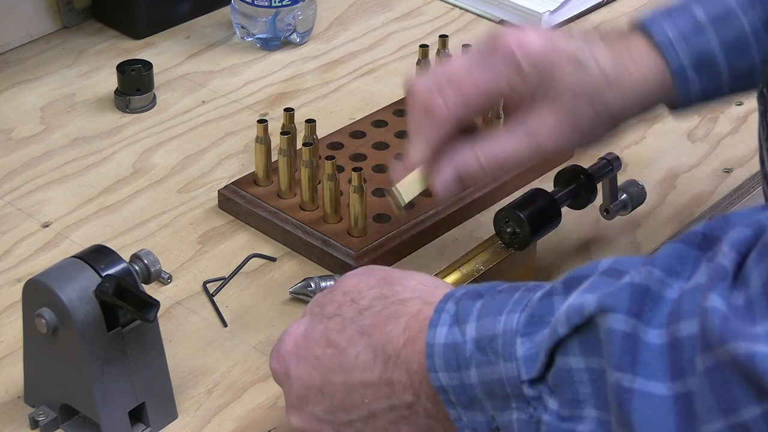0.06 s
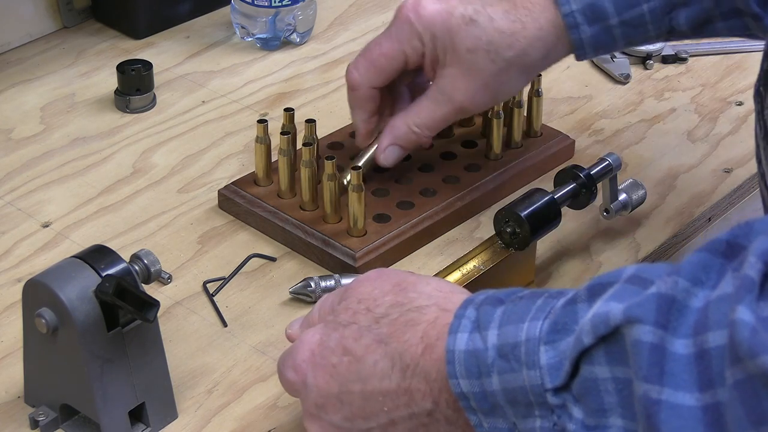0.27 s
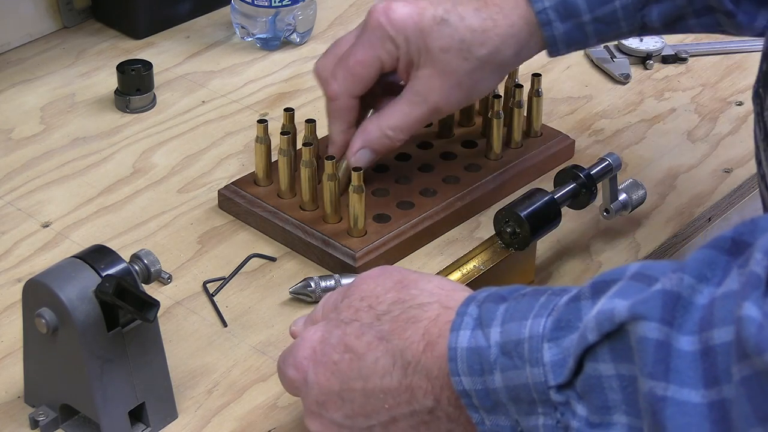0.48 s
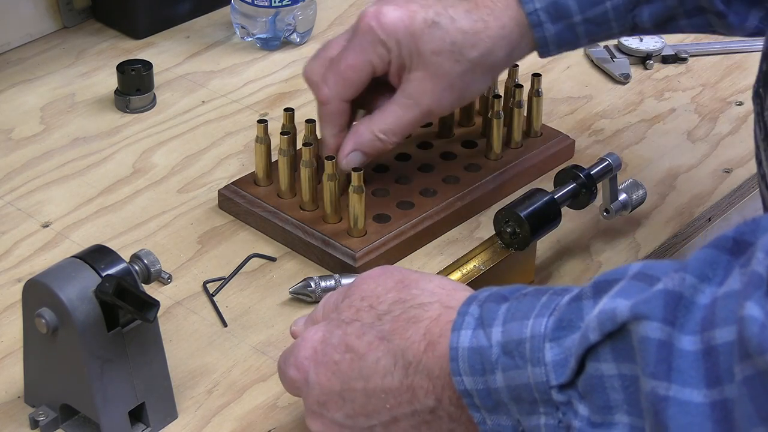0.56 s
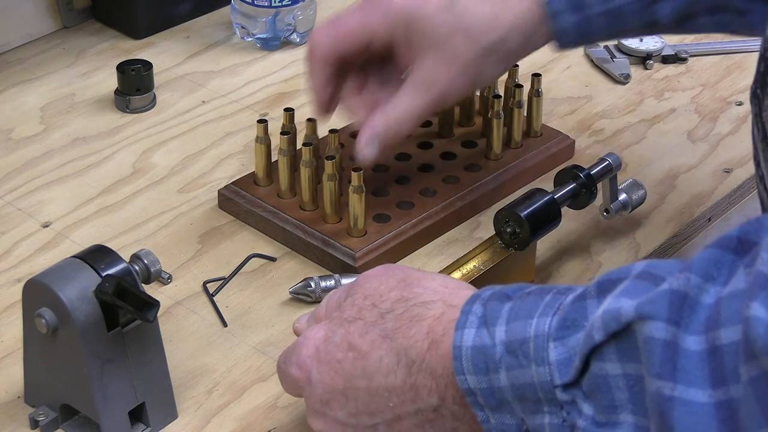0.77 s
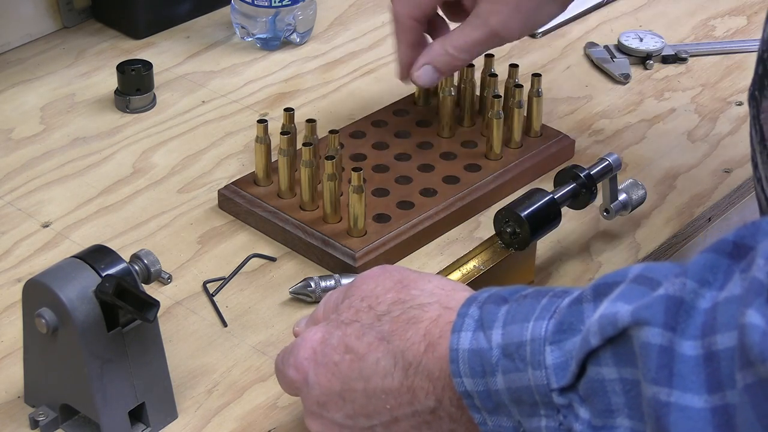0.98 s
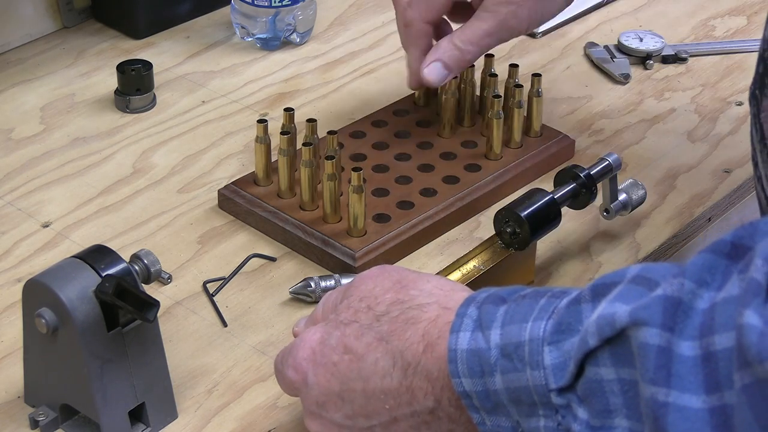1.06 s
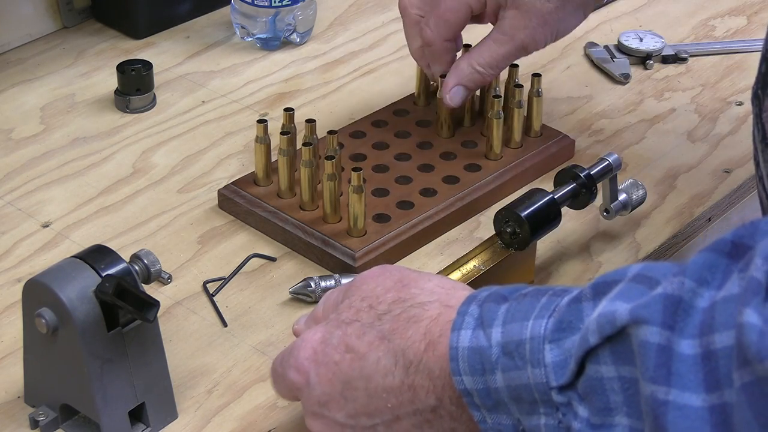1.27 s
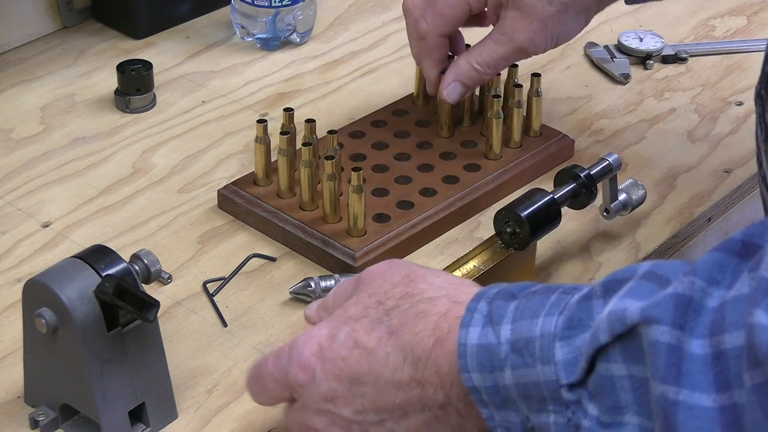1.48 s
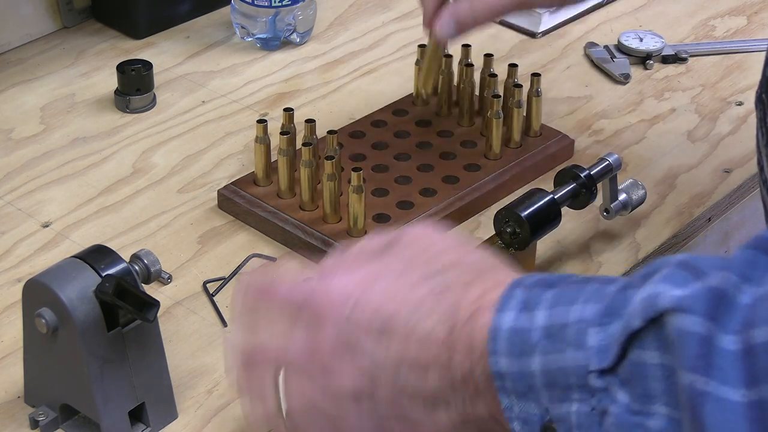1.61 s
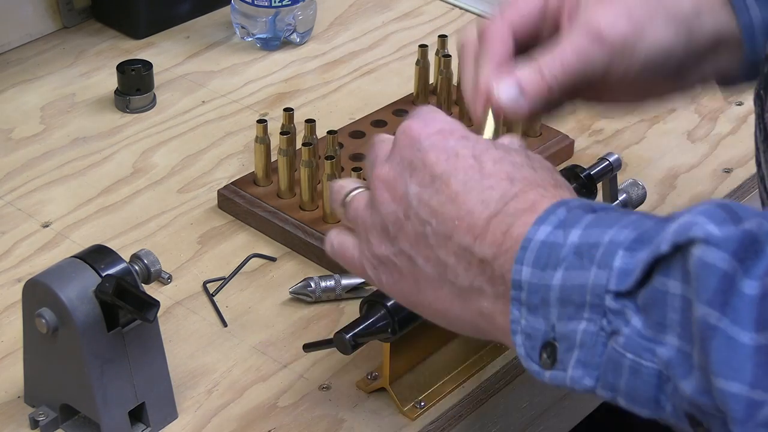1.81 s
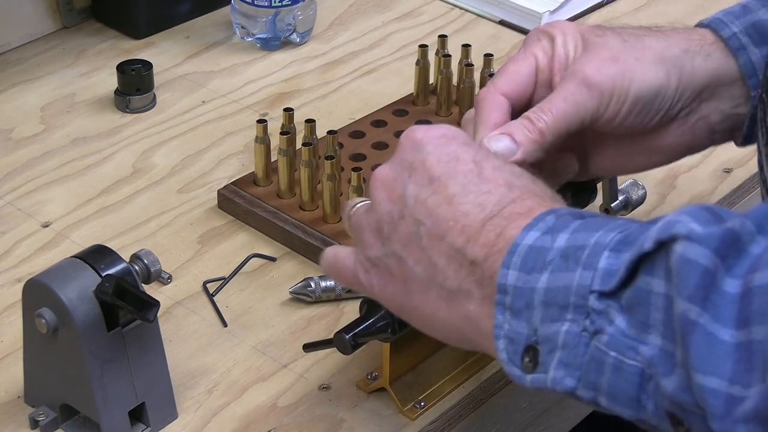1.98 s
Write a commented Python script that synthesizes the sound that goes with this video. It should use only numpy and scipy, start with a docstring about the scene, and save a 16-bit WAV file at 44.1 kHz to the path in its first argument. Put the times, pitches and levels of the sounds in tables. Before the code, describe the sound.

A brass cartridge case drops into a wooden block with a knock and a thin ring. Fingers rattle other cases and draw one out with a faint scrape, over soft bench thumps in a small room.

```python
"""A wooden workbench in a small, live room; one microphone hears the bench and the walls' reply.
A brass cartridge case drops into a wooden loading block: the wood knocks, the thin brass rings and
settles. Fingers rattle the next cases in their holes and draw one out with a faint scrape.
Underneath are steady room tone, a rustling sleeve and dull low bench thumps, from the brass knocks
and the shifting forearm."""
import sys
import numpy as np
from scipy import signal
from scipy.fft import rfft, irfft
from scipy.io import wavfile
from scipy.ndimage import uniform_filter1d

SR = 44100
rng = np.random.default_rng(int(sys.argv[2]) if len(sys.argv) > 2 else 0)


def output_pcm(signal):
    """Save a mono or channel-first signal as 16-bit PCM at the path in sys.argv[1].

    Samples are clipped to [-1, 1] before scaling.
    """
    pcm = np.clip(np.atleast_2d(signal).T, -1, 1) * 32767
    wavfile.write(sys.argv[1], SR, np.round(pcm).astype(np.int16))


N = 90404

# the room's decay time: frequency_hz, t60_s
ROOM_DECAY = [(150, 0.4), (500, .5), (1400, 0.56), (3700, 0.36), (9000, 0.52), (15000, 0.03)]
# colour of its reverberation: frequency_hz, gain_db
ROOM_COLOUR = [(150, 2), (1400, 0), (3700, -6), (9000, -11), (15000, -4.5)]
# steady room tone: frequency_hz, relative_db
ROOM_TONE = [(20, -0.5), (280, 1), (500, -0.5), (1000, -13), (2000, -23.5), (4000, -23), (8000, -29.5),
             (16000, -35)]
# the room still ringing from a knock just before: frequency_hz, gain_db
LINGERING_COLOUR = [(60, -13), (250, 8), (700, 13.5), (1500, -2.5), (4200, 5.5), (9800, -0.5), (12000, -25),
                    (16000, -28)]
# the sleeve's rustle: time_s, level_db
SLEEVE_LEVEL = [(0, -56.5), (.5, -59), (.68, -68.5), (1.001, -64), (1.2, -54), (1.42, -58.5), (1.62, -52),
                (1.78, -62.5), (1.94, -55.5), (2.05, -59.5)]
# colour of the cloth: frequency_hz, relative_db
SLEEVE_COLOUR = [(40, -3), (250, 6.5), (550, 0.5), (1200, -6.5), (2500, -23.5), (5000, -24.5),
                 (16000, -33.5)]
# dull low bench thumps, from the brass knocks and the shifting forearm: start_s, pitch_hz, level_db
BENCH_THUMPS = [(0.225, 135.5, -46), (.83, 124, -44), (1.072, 178.5, -43), (1.151, 130, -33),
                (1.175, 64.3, -38), (1.2, 118.4, -34), (1.232, 85, -36.5), (1.275, 89, -37.5),
                (1.315, 74, -28), (1.354, 98.3, -30), (1.36, 148.6, -41), (1.505, 114, -38.5),
                (1.555, 100.5, -36), (1.608, 103, -40.5), (1.716, 94, -35), (1.738, 68.3, -31),
                (1.766, 136, -38.5), (1.86, 70, -44)]
# a case sliding: start_s, length_s, pitch_hz, width_hz, level_db
CASE_SCRAPES = [(1.438, .07, 9760, 249, -69.5), (1.556, 0.051, 10060, 300, -67),
                (1.905, 0.079, 4200, 1800, -66), (1.913, 0.049, 1000, 70, -58)]
# the hollow block (low), a case chattering in its hole (high): start_s, pitch_hz, level_db, t60_s
CHATTER_NOTES = [(0.2234, 475, -6, .026), (.2228, 3140, -29.5, 0.03), (.3945, 594, -26.5, 0.036),
                 (0.3948, 1216, -33, 0.047), (0.3941, 1836, -36.5, 0.066), (0.7043, 4180, -35.5, 0.021),
                 (.7597, 1983, -31, 0.041), (.7597, 3560, -26, 0.04), (.7597, 4520, -24, .028),
                 (0.8225, 490, -8, .023), (1.0712, 3000, -9, .004), (1.0716, 1760, -44, 0.031),
                 (1.0739, 4640, -31.5, .045), (1.074, 4400, -50.5, 0.74), (1.229, 4420, -21, .024),
                 (1.229, 4430, -54.5, 0.47), (1.474, 2102, -35.5, 0.057), (1.4741, 3190, -21, 0.007),
                 (1.633, 2207, -41, 0.099), (1.633, 1322, -42, 0.097), (1.632, 1028, -40.5, 0.096)]
# wall modes of a case, in three close groups: pitch_hz, relative_db, t60_s
WALL_MODES = [
    [(9066, -1.5, .6), (9080, -1, .16), (9370, -2, .07)],
    [(9783, -6, .25), (9811, -9, .2), (9825, 2, .055), (9848, -18, .25)],
    [(12484, 0, .33), (12515, -7, .3)],
]
# a case ringing: start_s, low_group_db, mid_group_db, high_group_db, damping_db_per_s, room_gain
CASE_CLINKS = [(.223, -35, -19, -45.5, 6.4, 0.39), (.7597, -51.5, -54, -53.5, 70, 0.73),
               (1.073, -47, -58, -64, 330, 0.81), (1.229, -67, -57, -67, 70, 0.77)]
# colour shared by all knocks: frequency_hz, gain_db
WOOD_COLOUR = [(40, -24), (340, -8), (450, 0), (800, -2.5), (2700, -4), (4500, -.5), (5100, -8.5),
               (7000, -4.5), (9800, -4), (11300, -13), (16000, -22)]
# resonances of block, bench and seated cases: pitch_hz, width_hz, lift_db
BLOCK_RESONANCES = [(524, 26, 6), (588, 20, 4.5), (766.5, 22, 7), (1214, 60, 5.5), (1336, 45, 5),
                    (1850, 70, 5), (2014, 160, 4.5), (3290, 130, 6), (3920, 70, 4), (4430, 140, 4),
                    (5520, 160, 9), (6090, 230, 6), (8440, 100, 5)]
# the five bands of a knock: thud_hz, knock_hz, clack_hz, snap_hz, tick_hz
KNOCK_BANDS = (500, 1100, 2100, 4200, 8000)
# brass striking wood: start_s, thud_db, knock_db, clack_db, snap_db, tick_db
WOOD_KNOCKS = [ (0.2226, 13, 10.5, 11.5, 5.5, 2.5), (0.3934, -0.5, 2, -0.5, -17.5, -22.5),
               (0.5327, -15, -11, -12, -24, -28.5), (0.5605, -8, -15, -14, -26.5, -39),
               (0.5742, -3, -9, -15, -31, -36), (0.7042, -4.5, -12.5, -11.5, -19, -37),
               (0.756, -28, -5, -2.5, -3, -20), (.7595, -2.5, 4, 7, 4, -13), (.773, -9, -6, -2, -5.5, -21),
               (0.8218, 6.5, 5.5, 5.5, -17, -25.5), (1.0553, 1, 1, -1, -2.5, -22),
               (1.0711, -2.5, -1, 4, 2.5, -16.5), (1.075, -5.5, -4, -10, 1.5, -11.5),
               (1.2274, 4.5, -0.5, 0, 0, -20.5), (1.4741, -10, -13, -3.5, -10, -36),
               (1.483, -8, -4.5, -6, -11, -44), (1.632, -7.5, -6.5, -11, -16, -24),
               (1.638, -10.5, -9, -11.5, -24, -37)]


def amp(db):
    """Decibels to gain."""
    return 10 ** (np.asarray(db) / 20)


def unit(x):
    """Scales to rms 1."""
    return x / np.sqrt(np.mean(x ** 2) + 1e-20)


def curve_at(points, hz):
    """Reads a curve on a log-frequency axis."""
    frequencies, values = np.transpose(points)
    return np.interp(np.log(hz + 1), np.log(frequencies), values)


def add(mix, start_s, sound):
    """Mixes a sound in at start_s."""
    part = mix[round(start_s * SR):][:len(sound)]
    part += sound[:len(part)]


def colour(x, points):
    """Filters x by a gain curve."""
    hz = np.fft.rfftfreq(len(x), 1 / SR)
    return irfft(rfft(x) * amp(curve_at(points, hz)), len(x))


def ringing_response(db):
    """The minimum-phase impulse response of a gain curve."""
    cepstrum = irfft(np.log(amp(db)))
    half = len(cepstrum) // 2
    folded = np.r_[cepstrum[0], 2 * cepstrum[1:half]]
    return irfft(np.exp(rfft(folded, len(cepstrum))))[:half]


def whiten(burst, bins):
    """Evens out the broad colour of a burst and keeps its fine ripple."""
    spectrum = rfft(burst, 2 * len(burst))
    broad_power = uniform_filter1d(abs(spectrum) ** 2, bins)
    return irfft(spectrum / np.sqrt(broad_power + 1e-12))[:len(burst)]


def mode(t, hz, db, t60):
    """One dying vibration."""
    return amp(db - 60 * t / t60) * np.sin(2 * np.pi * hz * t)


def flutter(count, hz):
    """Slow complex noise of rms about 1."""
    lowpass = signal.butter(2, hz, fs=SR, output="sos")
    slow = signal.sosfilt(lowpass, rng.standard_normal((2, count + SR // 2)))
    real, imag = unit(slow)[:, -count:]
    return (real + 1j * imag) / np.sqrt(2)


def room_tail(rise_s=0.0087):
    """The walls' diffuse reply at the microphone, each band dying at its own speed."""
    hz, t, bands = signal.stft(rng.standard_normal(SR * 2 // 3), SR, nperseg=256)
    t60 = curve_at(ROOM_DECAY, hz)[:, None]
    equal_energy = np.sqrt(np.log(1e6) / t60 / SR)
    bands *= amp(curve_at(ROOM_COLOUR, hz)[:, None] - 60 * t / t60) * equal_energy
    tail = signal.istft(bands, SR, nperseg=256)[1]
    age = np.arange(len(tail)) / SR
    return tail * (1 - np.exp(-(age / rise_s) ** 2))


def in_room(direct, wet):
    """The direct sound with its reverberation."""
    return direct + wet * signal.fftconvolve(direct, room_tail())[:N]


def room_tone(level_db=-55.5):
    """Steady low noise all round the microphone."""
    return amp(level_db) * unit(colour(rng.standard_normal(N), ROOM_TONE))


def lingering_ring(age_s=0.03):
    """The room still rings from a knock just before."""
    out = np.zeros(N)
    add(out, 0, colour(room_tail(), LINGERING_COLOUR)[round(age_s * SR):])
    return out


def sleeve_rustle():
    """Soft cloth noise swells and sinks as the sleeve moves."""
    level_db = np.interp(np.arange(N) / SR, *np.transpose(SLEEVE_LEVEL))
    return amp(level_db) * unit(colour(rng.standard_normal(N), SLEEVE_COLOUR))


def bench_thumps(peak_s=0.0094, roughness=0.49, roughness_hz=70.4):
    """Brass knocks and the shifting forearm set the bench swinging for a few uneven cycles."""
    out, t = np.zeros(N), np.arange(SR // 5) / SR
    envelope = t / peak_s * np.exp(1 - t / peak_s)
    for start_s, hz, db in BENCH_THUMPS:
        swing = (1 + roughness * flutter(len(t), roughness_hz)) * np.exp(2j * np.pi * hz * t)
        add(out, start_s, amp(db) * envelope * swing.imag)
    return out


def case_scrapes():
    """Friction swells and fades in one resonance: a narrow one sings, a wide one hisses."""
    out, t = np.zeros(N), np.arange(SR // 10) / SR
    for start_s, length_s, hz, width_hz, db in CASE_SCRAPES:
        swell = np.sin(np.pi * np.minimum(t / length_s, 1))
        friction = 2 * (flutter(len(t), width_hz / 2) * np.exp(2j * np.pi * hz * t)).real
        add(out, start_s, amp(db) * swell * friction)
    return out


def block_chatter(rise_cycles=2.9):
    """Single blows bring out notes of block and cases, building over a few cycles."""
    out, t = np.zeros(N), np.arange(SR // 2) / SR
    for start_s, hz, db, t60 in CHATTER_NOTES:
        rise = 1 - np.exp(-t * hz / rise_cycles)
        add(out, start_s, mode(t, hz, db, t60) * rise)
    return out


def brass_clinks(rise_s=0.0016):
    """The thin wall rings in beating groups of high modes; fingers damp it, the room carries it on."""
    out, t = np.zeros(N), np.arange(N) / SR
    for start_s, *group_levels, damping_db_per_s, wet in CASE_CLINKS:
        ring = sum(mode(t, hz, group_db + db, t60)
                   for group_db, group in zip(group_levels, WALL_MODES)
                   for hz, db, t60 in group)
        envelope = amp(-damping_db_per_s * t) * np.minimum(t / rise_s, 1)
        add(out, start_s, in_room(ring * envelope, wet))
    return out


def path_to_microphone(click=0.5, scatter_rise_s=0.00158, scatter_s=0.008):
    """The direct click arrives first, then a patter off nearby things, then the walls farther off."""
    t = np.arange(2048) / SR
    envelope = np.minimum(t / scatter_rise_s, 1) * np.exp(-(t / scatter_s) ** 2)
    near = rng.standard_normal(len(t)) * envelope
    near /= np.linalg.norm(near)
    near[0] += click
    path = room_tail()
    add(path, 0, whiten(near, bins=40))
    return path


def wood_knocks(top_hz=16000, dulling=0.25):
    """Each contact of brass on wood rings block and bench and fills the room."""
    out, hz = np.zeros(N), np.fft.rfftfreq(8192, 1 / SR)
    resonances_db = sum(lift_db / (1 + (2 * (hz - pitch_hz) / width_hz) ** 2)
                        for pitch_hz, width_hz, lift_db in BLOCK_RESONANCES)
    body_db = curve_at(WOOD_COLOUR, hz) + resonances_db
    for start_s, *band_levels in WOOD_KNOCKS:
        top_db = band_levels[-1] * (1 + dulling)  # a lighter contact lasts longer, so it is duller
        contact_db = curve_at([*zip(KNOCK_BANDS, band_levels), (top_hz, top_db)], hz)
        knock = ringing_response(body_db + contact_db)
        add(out, start_s, signal.fftconvolve(path_to_microphone(), knock))
    return out


def scene():
    """Bench and room at one microphone."""
    cases = brass_clinks() + in_room(case_scrapes(), wet=0.92) + in_room(block_chatter(), wet=0.503)
    knocks = wood_knocks() + lingering_ring()
    thumps = in_room(bench_thumps(), wet=0.2)
    return (cases + knocks + thumps + room_tone() + sleeve_rustle())[None]


def record(dry):
    """The recorder cuts the treble above its band limit."""
    edge_hz = 16150
    lowpass = signal.firwin(401, edge_hz, window=("kaiser", 9), fs=SR)
    return signal.oaconvolve(dry, lowpass[None], "same")


dry = scene()
out = record(dry)
output_pcm(out)
```